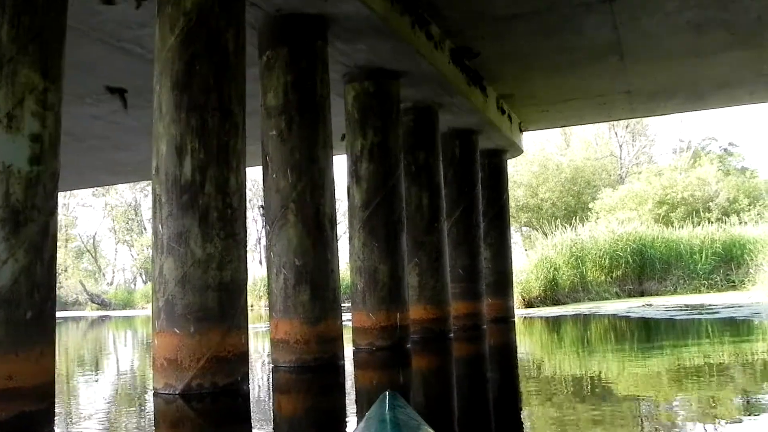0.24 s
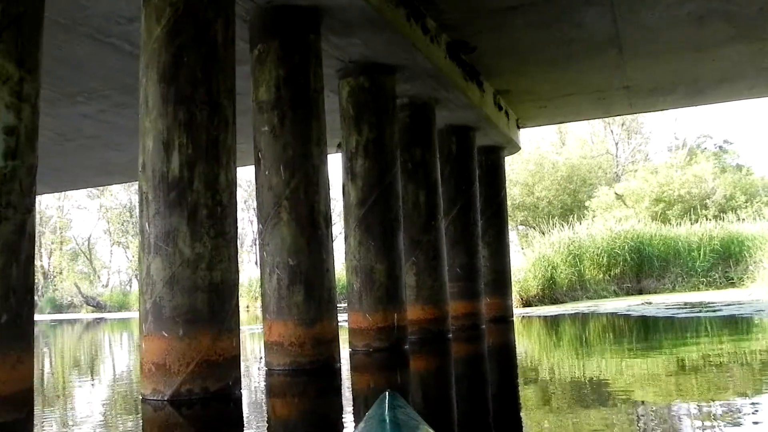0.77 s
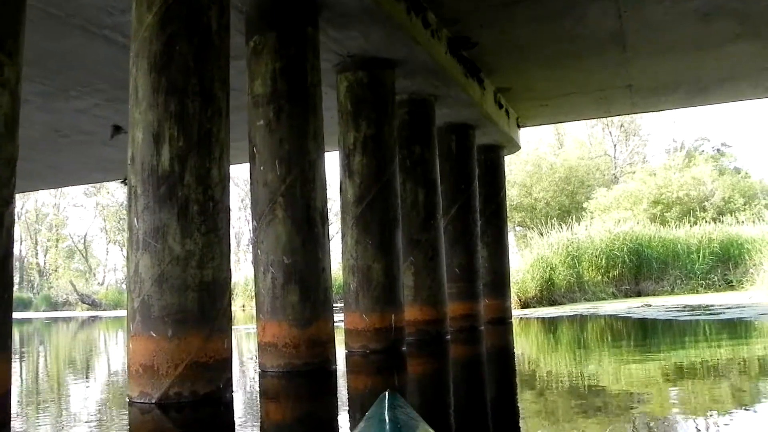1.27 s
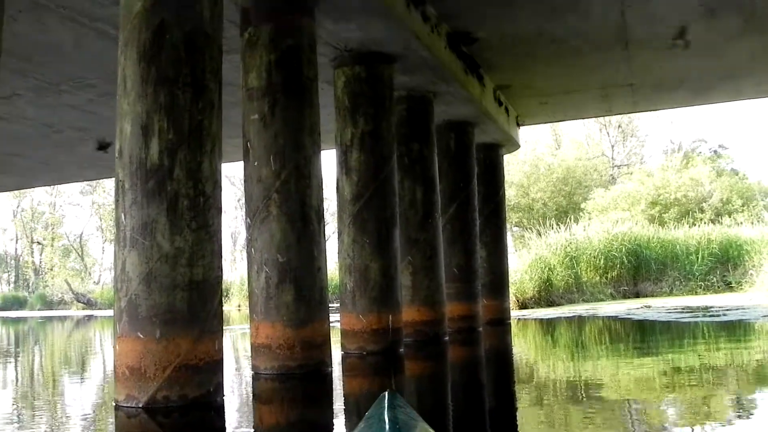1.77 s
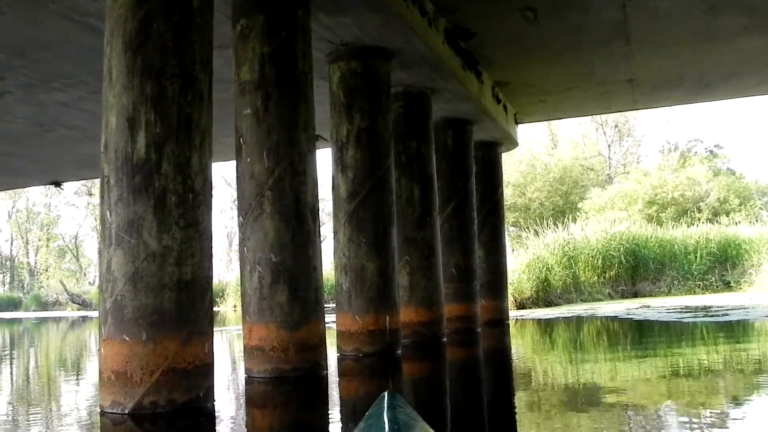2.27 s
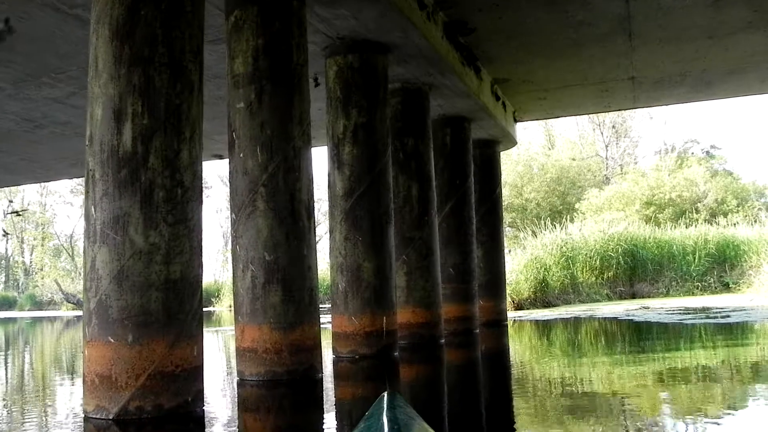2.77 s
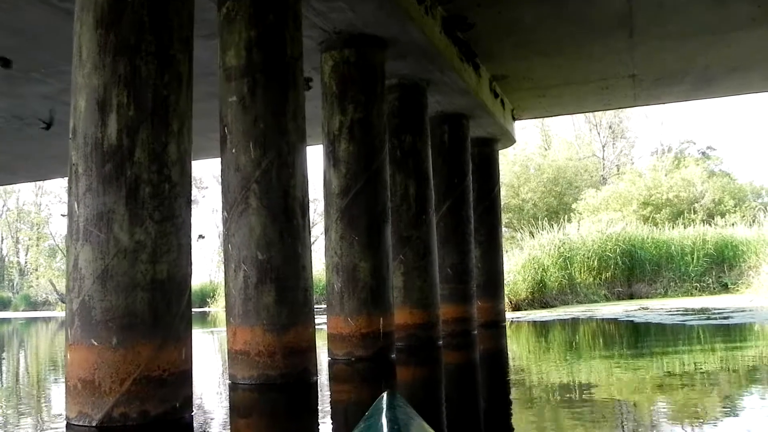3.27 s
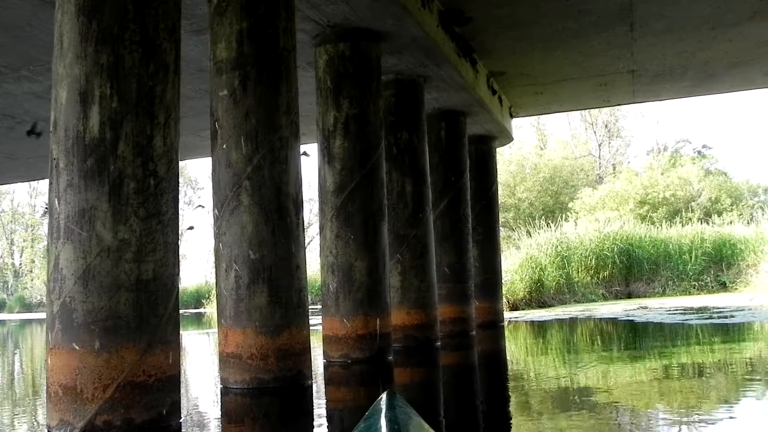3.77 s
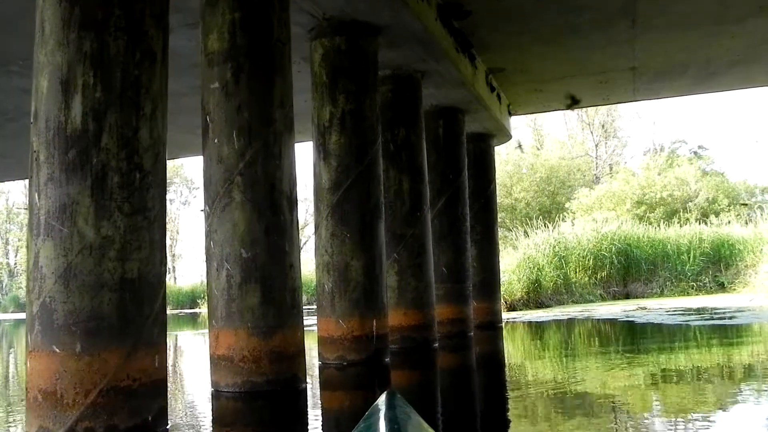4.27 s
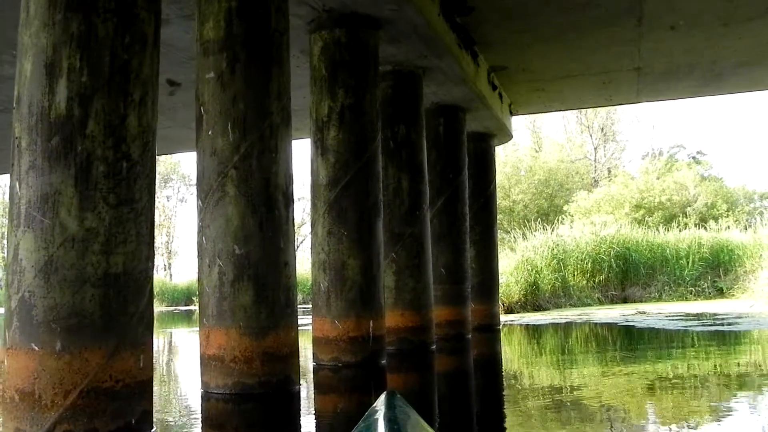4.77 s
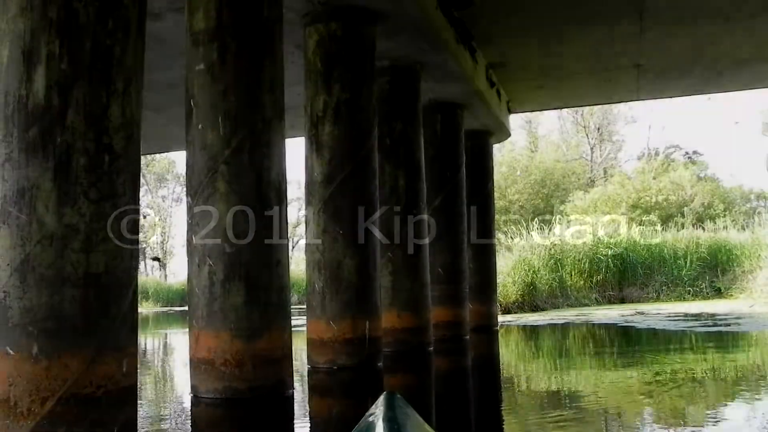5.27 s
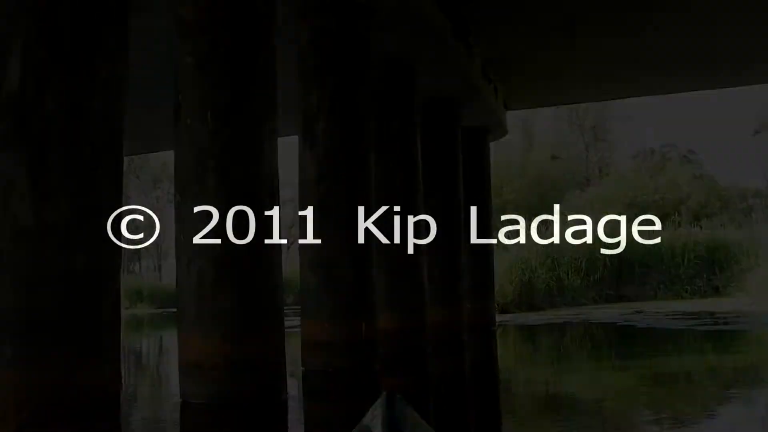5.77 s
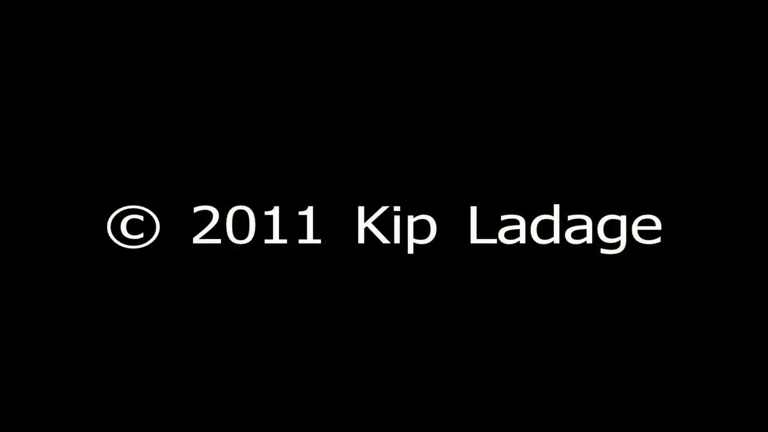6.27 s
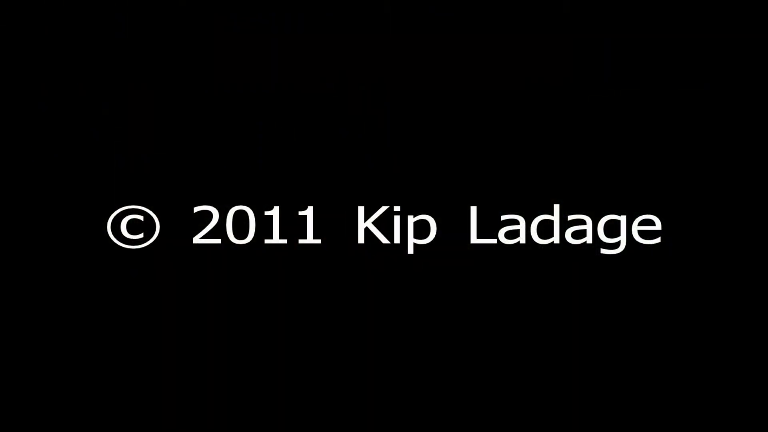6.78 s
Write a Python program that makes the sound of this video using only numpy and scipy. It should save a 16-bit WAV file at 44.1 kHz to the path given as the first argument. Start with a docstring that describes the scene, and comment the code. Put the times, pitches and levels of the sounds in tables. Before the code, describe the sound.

Stereo microphone in a boat under a bridge: overlapping short bird calls, gritty and buzzy, mostly sliding downward, ringing briefly off deck and piers. Farther birds merge into a hissing, uneven twitter above faint low outdoor rumble. Two quick multi-part shutter clatters and one small bouncing tap on the boat interrupt around the middle. Chatter continues, then is cut dead, leaving about a second of silence.

```python
"""Cliff swallow colony under a bridge

Heard from a boat on the river, under concrete: near birds give falling, rasping calls, many in two voices,
each a harmonic tone plus a fluttering rasp. Distant birds are short notes and patchy noise, blurred by the
echo of deck and piers, over a low murmur, with a few thin high notes and a faint steady whine.
A camera shutter clacks twice and something taps the boat once, all as noise bursts through body colours;
then the sound is switched off."""
import sys
import numpy as np
from scipy import signal
from scipy.fft import rfft, irfft, next_fast_len
from scipy.io import wavfile
from scipy.ndimage import uniform_filter1d, map_coordinates

SR = 44100
rng = np.random.default_rng(int(sys.argv[2]) if len(sys.argv) > 2 else 0)


def bounce(signal):
    """Save signal as a 16-bit WAV file at the path given by the first command-line argument."""
    frames = np.transpose(np.atleast_2d(signal))
    limited = np.clip(frames, -1, 1)
    pcm = np.round(limited * 32767).astype(np.int16)
    wavfile.write(sys.argv[1], SR, pcm)


N = 310023
TIME = np.arange(N) / SR

# All levels are relative: echoes, colours and mixing still act on them.
# Low murmur between deck and water. Each row: frequency in Hz, noise density in dB.
MURMUR_COLOUR = [(12, -48), (20, -18.5), (96, 2.5), (117, 0.5), (275, -13.5), (335, -11), (394, -1),
                 (566, -8), (715, -11), (1500, -12), (1950, -20.5), (3300, -120)]
MURMUR_DB = -44
# How alike the murmur is left and right. Each row: frequency in Hz, correlation (1 is identical).
MURMUR_LIKENESS = [(40, .5), (120, 1), (250, -0.26), (420, -0.33), (800, -0.504), (1500, 0.05)]
WHINE_HZ, WHINE_DB = 15690, -68

# Swelling and thinning of the distant colony. Each row: time in seconds, level in dB.
COLONY_LEVEL = [(0.0, -32), (.12, -34.5), (.5, -28), (0.621, -29.5), (1.3, -28.5), (1.5, -30), (1.62, -32),
                (2.001, -31), (2.13, -35.5), (2.299, -31.5), (2.501, -31.5), (2.62, -28.5), (3.02, -29),
                (3.141, -31), (3.55, -29.5), (3.85, -29.5), (4.08, -24), (4.46, -31), (4.65, -26.5),
                (4.9, -24.5), (5.2, -33), (5.45, -29.5), (5.74, -32.5), (5.98, -35.5), (6.2, -28)]
# Colour of the farthest birds. Each row: frequency in Hz, noise density in dB.
FAR_COLOUR = [(530, -21.5), (900, -12.5), (1160, -7), (1260, -7.5), (2050, -3), (3180, 0.5), (3670, -2),
              (4040, 0.5), (5120, -3.5), (6820, -16.5), (9290, -23), (12100, -29), (15500, -29.5)]

# Thin high notes. Each row: start in seconds, length in seconds, start pitch in Hz, end pitch in Hz, level in dB.
WHISTLES = [(.74, .12, 8050, 8750, -48), (1.48, .14, 6750, 6800, -53), (2.84, .33, 15300, 15700, -60),
            (5.27, .09, 8450, 8600, -49)]

# Releases of the camera shutter. Each row: start in seconds, level in dB.
SHUTTER_RELEASES = [(1.674, 1), (3.188, 0.5)]
# Contacts within a release. Each row: delay after it in seconds, level in dB, added level of the treble edge in dB.
SHUTTER_STROKES = [(0, -27.5, 1), (.009, -26.5, 3.5), (0.014, -26.5, 3), (.052, -25, -9.5), (.057, -25, -6),
                   (.073, -20.5, -17.5), (.1, -26, -2.5), (.104, -22, 0), (0.111, -26.5, 2.5),
                   (.137, -25, -5.5)]
EDGE_HZ = 6000  # the metallic edge lies above this
# Resonance of the camera body. Each row: frequency in Hz, gain in dB.
CAMERA_BODY = [(200, -32.5), (480, -1), (750, -10), (1200, 0.5), (2200, -2), (4500, -2.5), (7000, -13.5),
               (10000, -20.5), (15000, -30.5)]
# Something taps the boat and bounces. Each row: start in seconds, level in dB.
BOAT_KNOCKS = [(2.402, -18.5), (2.41, -20.5), (2.419, -19.5)]
# Resonance of the hull. Each row: frequency in Hz, gain in dB.
HULL = [(150, 3), (450, -8), (800, 5.5), (1600, -2), (2600, 2), (5000, -15), (9000, -10), (15000, -27.5)]

# Syrinx singing cleanly. Each row: multiple of the fundamental, level in dB.
CLEAN_HARMONICS = [(1, -9), (2, 2), (3, -9.5), (4, -27.5)]
# Syrinx rasping. Each row: multiple of the fundamental, level in dB.
RASP_HARMONICS = [(1, -10), (2, -3.5), (3, -8.5), (4, -14.5), (5, -21), (6, -15.5)]
# Throat and beak of the near birds. Each row: frequency in Hz, gain in dB.
THROAT_AND_BEAK = [(700, -11), (1400, -8.5), (2100, -1), (2700, -1.5), (3600, 0.5), (4400, -0.5),
                   (5250, 1.5), (6200, 0), (7500, -10.5), (10000, -7), (15000, -22)]
# Call pitches below are those of the second harmonic; a positive pan is louder on the left.
# Two-voiced calls. Each row: start in seconds; first voice: length in seconds, start pitch in Hz, level in dB,
# lift of its fundamental in dB; second voice: delay in seconds, length in seconds, start pitch in Hz,
# level in dB, lift of its third harmonic in dB; both: rasp level in dB, left-right difference in dB.
CHURRS = [(0.319, 0.11, 4660, -34.5, -1.5, 0.056, 0.088, 3980, -41, 30, -24, 2),
          (0.649, 0.11, 4535, -32, -2.5, 0.031, 0.12, 3980, -32.5, 14, -26, -1.5),
          (1.014, 0.09, 4415, -34, 2.5, 0.06, 0.094, 3700, -38, 17, -28, -5),
          (1.14, 0.1, 4310, -29, 6, 0.033, 0.057, 3450, -32, 8.5, -31, -7.5),
          (1.309, 0.14, 4420, -31, 4.5, 0.0046, 0.089, 4463, -28, -7.5, -33.5, -7.5),
          (2.692, .16, 4380, -28.5, 3, 0.047, .075, 4170, -30.5, -2, -30, -4),
          (3.185, .16, 4250, -30, -5, .08, .09, 3350, -40, 4, -38, 5),
          (3.613, .12, 4656, -38.5, 10.5, .052, .11, 3797, -35.5, 16, -29, -2.5),
          (3.9, 0.12, 4950, -31, 4, 0.063, 0.083, 3800, -35.5, 9, -26, 5),
          (4.095, .065, 4250, -40, 2, .045, .055, 3330, -41, 14, -29.5, 2.5),
          (4.24, .085, 4500, -29.5, 2, .004, .08, 3900, -35, 9, -28.5, -.5),
          (4.524, 0.11, 4670, -37, 0, 0.052, 0.1, 3760, -41, 17, -28.5, -7),
          (4.89, .105, 4360, -32, -3, .04, .045, 3720, -31, 6, -23, -6),
          (5.388, 0.1, 4653, -35.5, 1, 0.032, 0.11, 3800, -35.5, 16.5, -25, -7.5),
          (5.789, 0.072, 4250, -35, 5, 0.028, 0.08, 3560, -38, 0, -30, 5),
          (6.078, 0.13, 4594, -30, -1, 0.071, 0.11, 3730, -33.5, 16, -28, -8)]
# Single-voiced chirps, from nearly level to steeply falling. Each row: start in seconds, length in seconds,
# start pitch in Hz, end pitch in Hz, tone level in dB, rasp level in dB, left-right difference in dB.
CHIRPS = [(.145, .105, 5280, 4185, -30.5, -40.5, 17), (.18, 0.11, 3650, 2886, -38, -37.5, 5),
          (.5, 0.05, 4690, 4490, -33, -40.5, 9), (.528, .07, 4100, 3133, -28.5, -37, 8),
          (.858, 0.075, 5340, 4150, -27, -38.5, 11), (1.04, 0.052, 3890, 3750, -30, -43.5, -17.5),
          (1.765, .1, 5440, 4500, -37, -26, -5.5), (3.195, 0.15, 5210, 3150, -38, -37, -1.5),
          (3.334, 0.086, 4450, 3515, -41, -29, 1), (3.453, .05, 3820, 3115, -30, -32.5, 10),
          (3.425, .03, 4650, 4290, -36, -36.5, 6.5), (3.612, 0.071, 7030, 6500, -32.5, -40, 1.5),
          (3.703, 0.055, 5280, 5100, -31, -24.5, -0.5), (3.905, 0.093, 4400, 4240, -31.5, -35.5, 3),
          (4.714, 0.081, 5480, 4510, -29.5, -33.5, 18), (4.724, 0.056, 4035, 3420, -28.5, -39, 7.5),
          (4.85, .025, 3860, 3660, -31, -32.5, 1.5), (4.885, 0.066, 5470, 4700, -36.5, -26, 8.5),
          (5.066, 0.1, 3900, 2314, -38, -30, -2), (5.076, 0.08, 5390, 4520, -34.5, -46, 4.5),
          (5.49, 0.085, 4934, 3813, -32.5, -27, -0.5), (5.811, 0.076, 5840, 4320, -36, -44, -0.5),
          (6.19, 0.069, 3980, 3326, -43, -23.5, -2.5)]
# Short single-voiced notes, faint to loud, rising or falling. Each row: start in seconds, length in seconds,
# start pitch in Hz, end pitch in Hz, level in dB, left-right difference in dB.
SQUEAKS = [(1.5, .07, 2280, 2210, -42, 8), (2.161, 0.026, 4250, 4550, -46, -4),
           (2.213, .05, 4200, 4070, -39, 7), (2.229, .03, 5120, 4880, -38.5, 1),
           (2.206, .06, 2620, 2470, -38, 3), (2.343, 0.031, 4210, 4550, -40.5, 0.5),
           (2.425, 0.025, 4150, 4450, -42, 2.5), (2.595, 0.039, 3064, 2833, -33.5, 1),
           (2.644, .025, 2790, 2720, -33.5, 0.5), (2.944, 0.048, 4180, 3885, -39, -0.5),
           (4.13, .036, 4400, 4990, -40, 6.5), (4.177, 0.062, 3390, 4280, -35, 2),
           (5.29, 0.057, 5150, 4640, -37, 4), (5.269, 0.11, 2427, 2200, -42.5, 3),
           (5.41, 0.034, 4605, 4450, -27, -14.5), (6, 0.021, 4155, 4800, -40, 16),
           (6.051, 0.045, 2994, 2793, -33.5, 8), (6.084, 0.059, 3515, 3210, -27, 7)]
SQUEAK_RASP_DB = -1  # against the tone

# A first voice sinks by a base rate plus a rate that grows with its length; a second one drops fast
SLOW_SAG_HZ_PER_S, SAG_GROWTH_HZ_PER_S2, STEEP_SAG_HZ_PER_S = 2500, 29000, 11700
SECOND_LOW_DB = -4.5  # lift of the second voice's fundamental
FIRST_BEND, SECOND_BEND, CHIRP_BEND = .55, -.4, .1  # above 0 a slide steepens, below 0 it flattens out
# Grain of a voice; RASP_FOLLOWS is the share of a harmonic's lift that the rasp takes
RASP_JITTER_RAD, FLUTTER_RAD, FLICKER_DB, RASP_FOLLOWS = .4, 1.8, 3.6, .25


def amp(db):
    """Decibels to gain."""
    return 10 ** (np.asarray(db) / 20)


def unit(x):
    """x at rms 1."""
    return x / np.sqrt(np.mean(x ** 2) + 1e-20)


def along(points, hz):
    """(Hz, value) points read on a log frequency axis."""
    f, v = np.transpose(points)
    return np.interp(np.log(hz + 1), np.log(f + 1), v)


def wobble(rate, size):
    """A smooth random curve with rate knots a second."""
    knots = np.random.default_rng(rng.integers(2 ** 31)).standard_normal(int(size * rate / SR) + 4)
    return map_coordinates(knots, [np.arange(size) * rate / SR])


def filtered(x, response):
    """x through a gain that is a function of frequency."""
    m = next_fast_len(N + SR // 2)
    return irfft(rfft(x, m) * response(np.fft.rfftfreq(m, 1 / SR)), m)[..., :N]


def coloured(x, points):
    """x through a (Hz, dB) colour."""
    return filtered(x, lambda hz: amp(along(points, hz)))


def add(track, s, x):
    """Mix x into the track at s seconds."""
    part = track[..., max(round(s * SR), 0):][..., :x.shape[-1]]
    part += x[..., :part.shape[-1]]


def echoes(t60, size):
    """A stereo train of dying noise echoes with unit energy, after a 3 ms gap."""
    t = np.arange(size) / SR
    late_enough = t > .003
    decay = amp(-60 * t / t60)
    return unit(rng.standard_normal((2, size)) * late_enough * decay) / np.sqrt(size)


def spot(x, early_db, early_t60, pan_db=0):
    """x from one spot: the straight path plus quick echoes off the deck and the water."""
    paths = amp(early_db) * echoes(early_t60, size=SR // 8)
    paths[[0, 1], [0, 1]] += 1  # the straight path, one sample later on the right
    sides = unit(amp([[pan_db / 2], [-pan_db / 2]]))
    constant_energy = np.hypot(1, amp(early_db))
    return signal.fftconvolve(x[None], paths * sides / constant_energy, axes=1)


def piers(x, late_db, late_t60):
    """Stereo x with the longer, directionless ring among the piers."""
    middle = (x[:1] + x[1:]) / 2
    ring = signal.fftconvolve(middle, echoes(late_t60, size=SR), axes=1)[:, :N]
    return x + amp(late_db) * ring


def glide(length, start_hz, end_hz, waver, bend=0.3033):
    """Progress 0-1 and phase of a wavering note whose slide steepens (bend above 0) or flattens (below 0)."""
    u = np.linspace(0, 1, int(length * SR))
    slide = (1 - bend) * u + bend * u * u
    hz = (start_hz + (end_hz - start_hz) * slide) * (1 + waver * wobble(350, len(u)))
    return u, 2 * np.pi * np.cumsum(hz) / SR


def swell(u, power):
    """A note opens and closes in one arch; low powers make it squarer."""
    return np.abs(np.sin(np.pi * u)) ** power


def murmur():
    """Low outdoor noise between deck and water; mid and side shares set how alike the two channels are."""
    def mid_and_side(hz):
        turn = np.arccos(np.clip(along(MURMUR_LIKENESS, hz), -.9, 1)) / 2
        return amp(along(MURMUR_COLOUR, hz)) * np.array([np.ones_like(hz), np.tan(turn)])

    mid, side = filtered(rng.standard_normal((2, N)), mid_and_side)
    pair = np.array([mid + side, mid - side]) / np.std(mid)
    drift_db = .7 * wobble(7, N)
    return pair * amp(MURMUR_DB + drift_db) * amp([[-1], [.8]])  # a little stronger on the right


def whine():
    """A faint electronic whine in the camera: one steady sine, alike in both channels."""
    return amp(WHINE_DB) * np.sin(2 * np.pi * WHINE_HZ * TIME)


def patchy(patchy_db):
    """Stereo noise that swells and thins in patches of pitch and time."""
    z = signal.stft(rng.standard_normal((2, N)), nperseg=512)[2]
    field = uniform_filter1d(rng.standard_normal(z.shape[1:]), size=5, axis=0)
    field = uniform_filter1d(field, size=8, axis=1)
    return signal.istft(z * amp(patchy_db * unit(field)), nperseg=512)[1][:, :N]


def far_birds(count=220):
    """Many short, grainy distant calls, mostly echo; the farthest merge into an uneven wash of noise."""
    calls = np.zeros(N)
    for when, long, high, fall, loud in rng.random((count, 5)):
        start_hz = 3300 + 2000 * high
        end_hz = start_hz * (1.02 - 0.27 * fall)
        u, phase = glide(.03 + .06 * long, start_hz, end_hz, waver=.018)
        grain = amp(3.9 * wobble(250, len(u)))
        tone = np.sin(phase) + 0.63 * np.sin(phase / 2)
        add(calls, when * TIME[-1], amp(9.9 * loud) * swell(u, power=0.4) * grain * tone)
    echo = piers(spot(calls, early_db=3.0, early_t60=0.18)[:, :N], late_db=0.5, late_t60=0.51)
    wash = coloured(patchy(patchy_db=2.2), FAR_COLOUR)
    colony = amp(-7) * unit(echo) + amp(-4) * unit(wash)
    s, db = np.transpose(COLONY_LEVEL)
    return amp(np.interp(TIME, s, db)) * colony


def whistles():
    """Faint thin high notes: single gliding sines with a few quick echoes."""
    out = np.zeros((2, N))
    for s, length, start_hz, end_hz, db in WHISTLES:
        u, phase = glide(length, start_hz, end_hz, waver=.003)
        note = amp(db) * swell(u, power=0.13) * np.sin(phase)
        add(out, s, spot(note, early_db=-11.5, early_t60=.15))
    return out


def tap(db, t60):
    """A hard contact: a crack of noise that dies in a few milliseconds."""
    t = np.arange(SR // 10) / SR
    return amp(db - 60 * t / t60) * rng.standard_normal(len(t))


def clacks():
    """A camera shutter strikes in a fixed sequence; the boat tap has weaker early echoes; the bridge answers both."""
    camera, boat = np.zeros((2, 2, N))
    treble = signal.butter(2, EDGE_HZ, "high", fs=SR, output="sos")
    for s, db in SHUTTER_RELEASES:
        for after, stroke_db, edge_db in SHUTTER_STROKES:
            edge = signal.sosfilt(treble, tap(db + stroke_db + edge_db + 20, t60=.016))
            stroke = edge + tap(db + stroke_db + 16, t60=0.019)
            add(camera, s + after, spot(stroke, early_db=5, early_t60=.12))
    for s, db in BOAT_KNOCKS:
        add(boat, s, spot(tap(db + 7, t60=.008), early_db=-5, early_t60=.1))
    return piers(coloured(camera, CAMERA_BODY) + coloured(boat, HULL), late_db=-4.5, late_t60=0.52)


def harmonic(k, db, phase):
    """Harmonic k of a voice, from the phase of its second harmonic."""
    return amp(db) * np.sin(k * phase / 2)


def voice(length, start_hz, end_hz, tone_db, rasp_db, bend, lifts_db=(0, 0, 0, 0), flutter_hz=520):
    """One side of the syrinx: a grainy gliding tone together with a fluttering rasp."""
    u, phase = glide(length, start_hz, end_hz, waver=0.0095, bend=bend)
    size = len(u)
    tone = 0
    for (k, db), lift in zip(CLEAN_HARMONICS, lifts_db):
        tone = tone + harmonic(k, db + lift, phase) * amp(FLICKER_DB * wobble(220, size))

    # the membranes flap, throwing strands of sidebands and noise around every harmonic
    rate_hz = flutter_hz * (1 + .12 * rng.standard_normal() + .06 * wobble(200, size))
    flutter = 2 * np.pi * np.cumsum(rate_hz) / SR
    rough_phase = phase + FLUTTER_RAD * np.sin(flutter) + RASP_JITTER_RAD * wobble(1800, size)
    rasp = 0
    for (k, db), lift in zip(RASP_HARMONICS, (*lifts_db, 0, 0)):
        rasp = rasp + harmonic(k, db + RASP_FOLLOWS * lift, rough_phase)
    rasp = rasp * (1 + 0.3 * np.cos(flutter)) * amp(2.8 * wobble(250, size))

    # the tone opens quickly; the rasp builds slower and peaks just past the middle
    tone_shape, rasp_shape = swell(u, power=.35), swell(u ** 1.2, power=.6)
    return amp(tone_db) * tone_shape * tone + amp(rasp_db) * rasp_shape * rasp


def near_voices():
    """A churr is a sinking voice joined by a second, falling one; chirps and squeaks have one voice."""
    for s, length, hz, db, low_db, after, length2, hz2, db2, third_db, rasp_db, pan_db in CHURRS:
        sag = SLOW_SAG_HZ_PER_S + SAG_GROWTH_HZ_PER_S2 * length
        first = voice(length, hz, hz - sag * length, db, rasp_db, FIRST_BEND, (low_db, 0, 0, 0))
        yield s, first, pan_db
        end_hz = hz2 - STEEP_SAG_HZ_PER_S * length2
        second_lifts_db = (SECOND_LOW_DB, 0, third_db, 0)
        second = voice(length2, hz2, end_hz, db2, rasp_db, SECOND_BEND, second_lifts_db)
        yield s + after, second, pan_db
    for s, length, start_hz, end_hz, tone_db, rasp_db, pan_db in CHIRPS:
        yield s, voice(length, start_hz, end_hz, tone_db, rasp_db, CHIRP_BEND), pan_db
    for s, length, start_hz, end_hz, db, pan_db in SQUEAKS:
        yield s, voice(length, start_hz, end_hz, db, db + SQUEAK_RASP_DB, CHIRP_BEND), pan_db


def near_birds():
    """Each call comes from its own spot under the deck, through throat and beak, and rings among the piers."""
    out = np.zeros((2, N))
    for s, call, pan_db in near_voices():
        add(out, s, spot(call, early_db=-4.5, early_t60=.2, pan_db=pan_db))
    ringing = piers(coloured(out, THROAT_AND_BEAK), late_db=-4.0, late_t60=0.58)
    return ringing * amp([[-.4], [.4]])  # a little stronger on the right


def scene():
    """Everything under the bridge, from the background to the near birds."""
    return murmur() + whine() + far_birds() + whistles() + clacks() + near_birds()


def record(dry):
    """The sound is switched off within 3 ms; nothing passes above the band limit."""
    off_s, top_hz = 6.261, 15850
    on = np.clip((off_s - TIME) / .003 + .5, 0, 1)
    return filtered(dry * on, lambda hz: hz < top_hz)


dry = scene()
out = record(dry)
bounce(out)
```